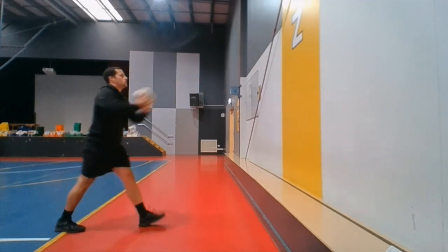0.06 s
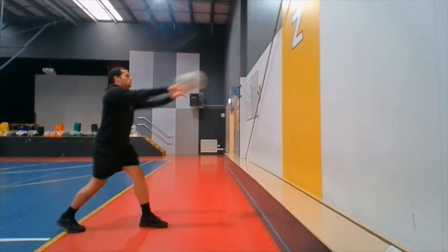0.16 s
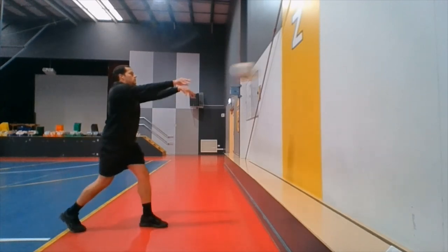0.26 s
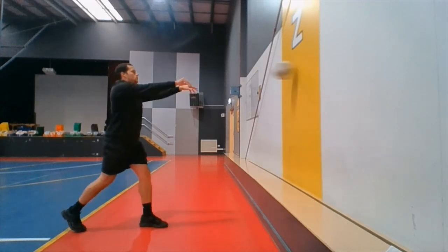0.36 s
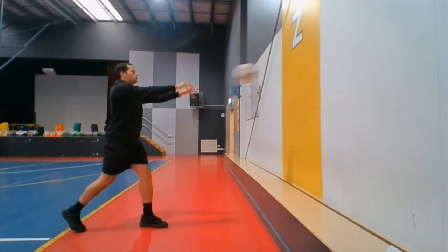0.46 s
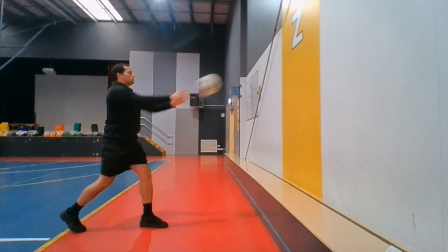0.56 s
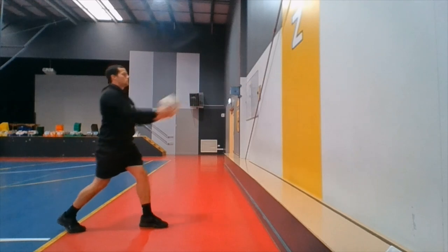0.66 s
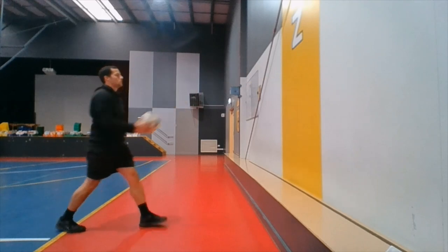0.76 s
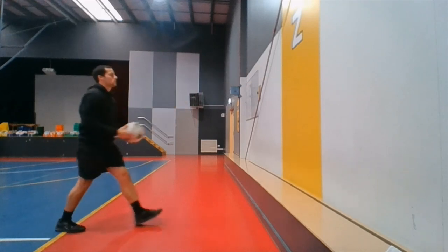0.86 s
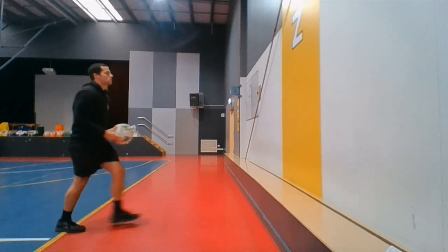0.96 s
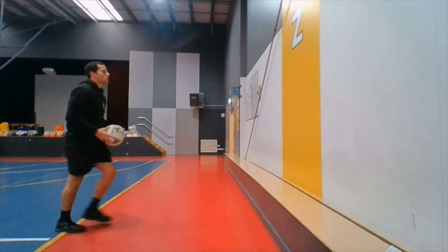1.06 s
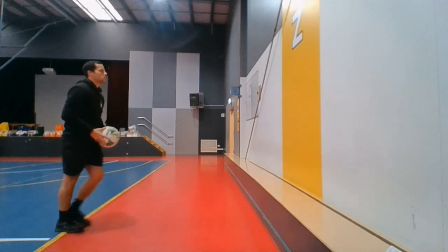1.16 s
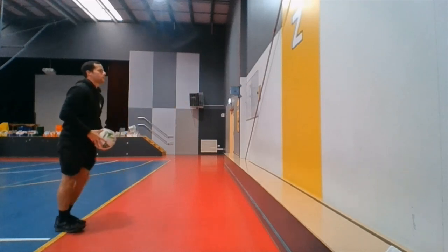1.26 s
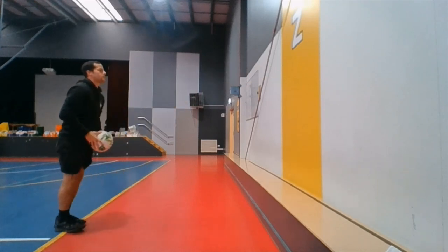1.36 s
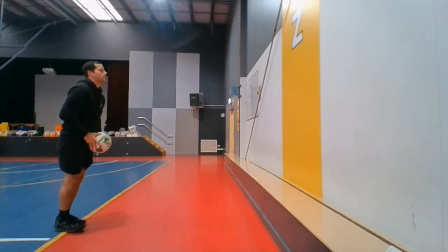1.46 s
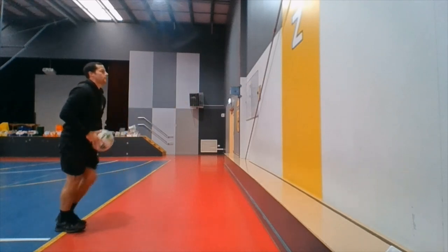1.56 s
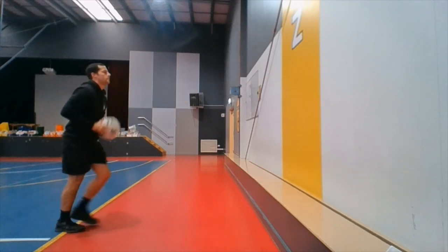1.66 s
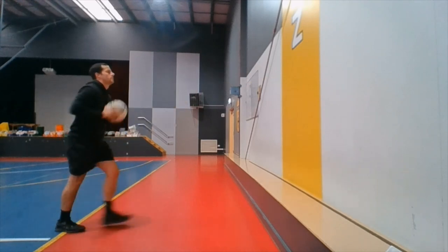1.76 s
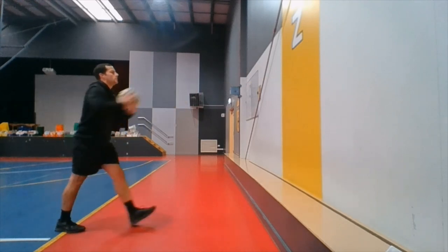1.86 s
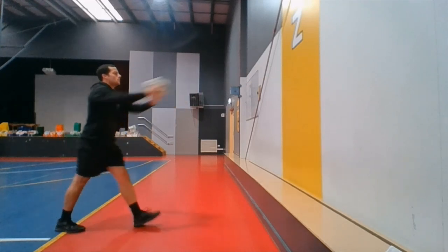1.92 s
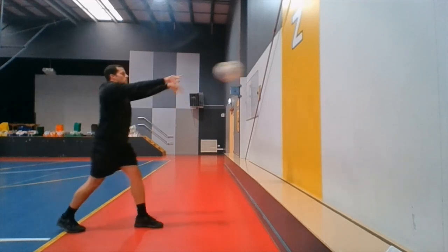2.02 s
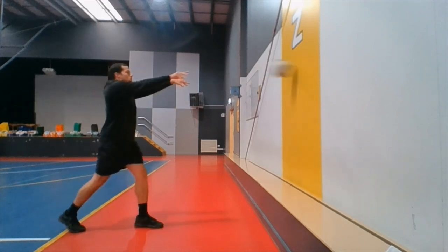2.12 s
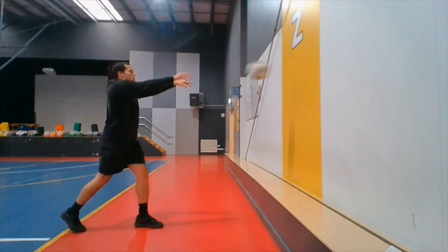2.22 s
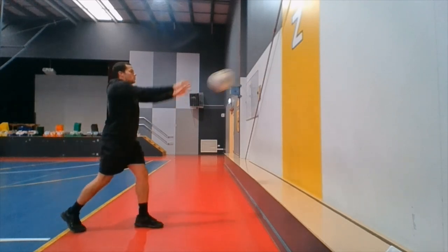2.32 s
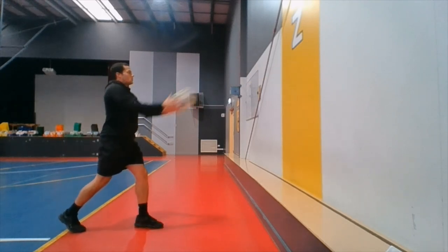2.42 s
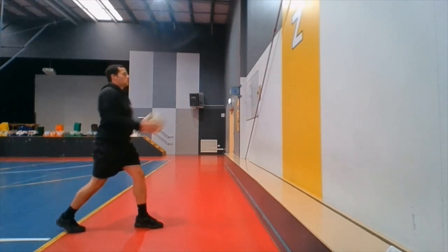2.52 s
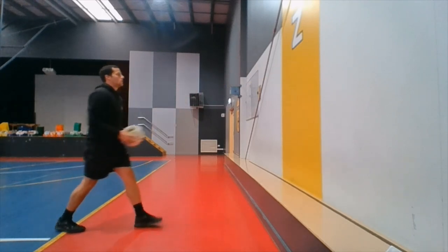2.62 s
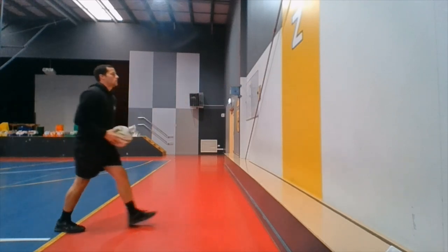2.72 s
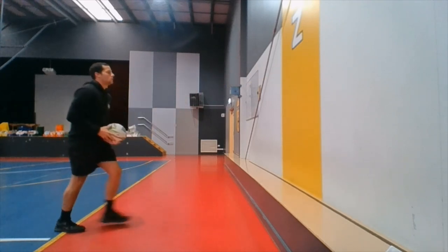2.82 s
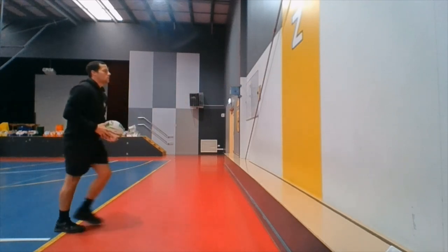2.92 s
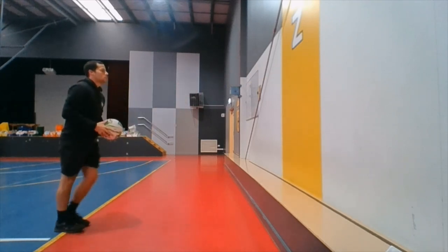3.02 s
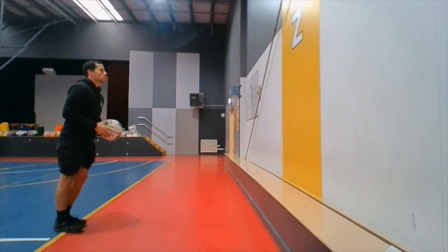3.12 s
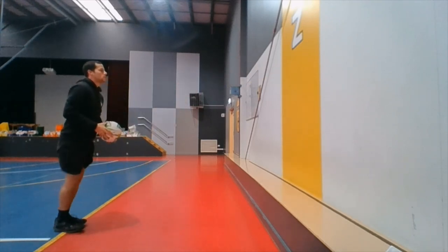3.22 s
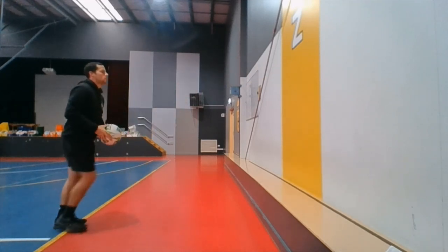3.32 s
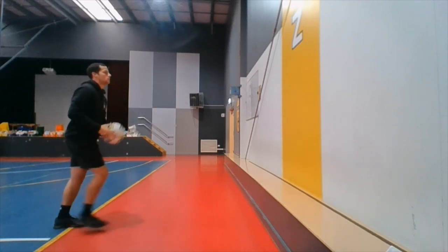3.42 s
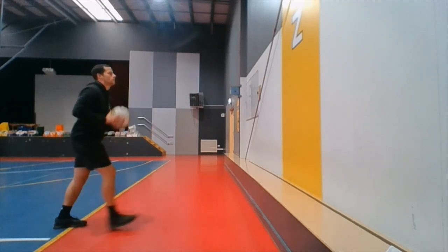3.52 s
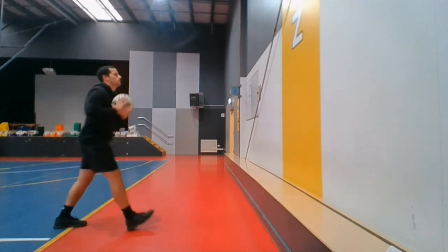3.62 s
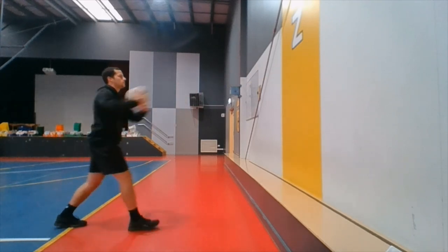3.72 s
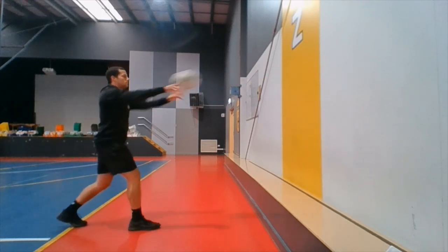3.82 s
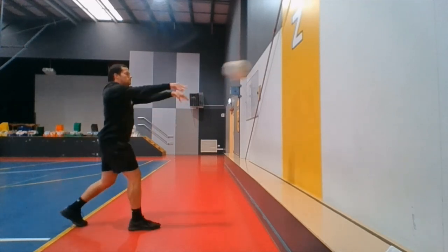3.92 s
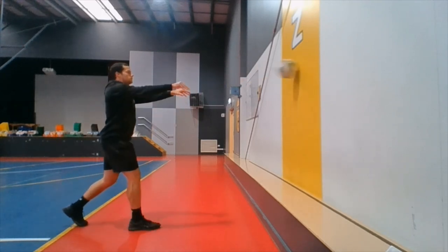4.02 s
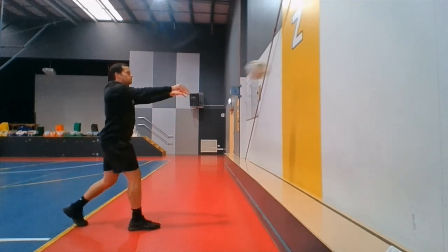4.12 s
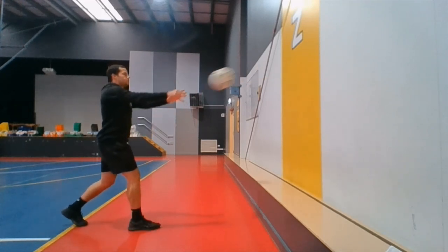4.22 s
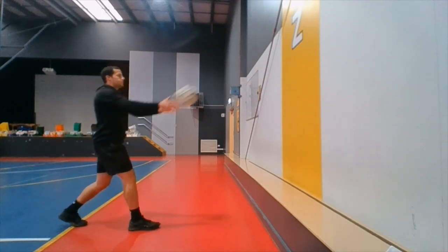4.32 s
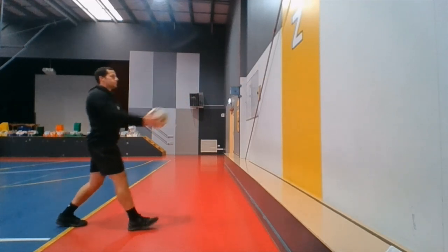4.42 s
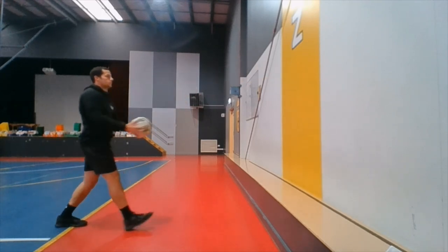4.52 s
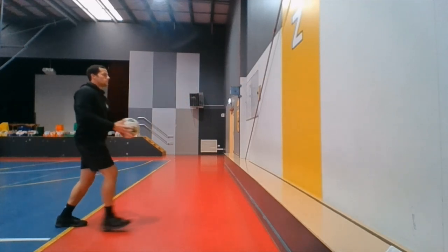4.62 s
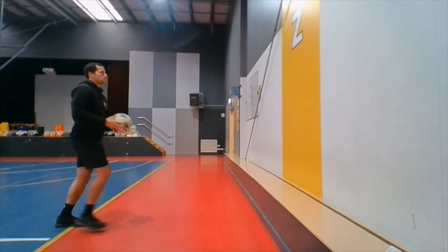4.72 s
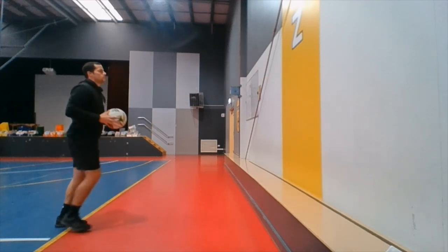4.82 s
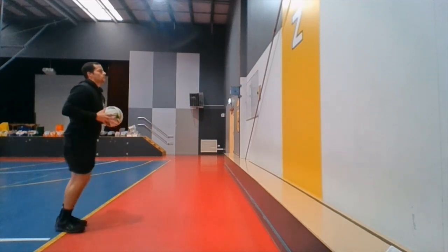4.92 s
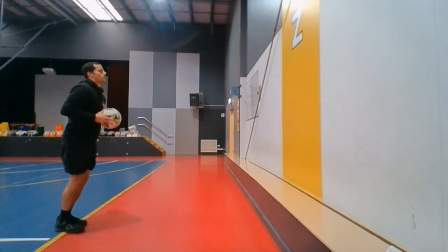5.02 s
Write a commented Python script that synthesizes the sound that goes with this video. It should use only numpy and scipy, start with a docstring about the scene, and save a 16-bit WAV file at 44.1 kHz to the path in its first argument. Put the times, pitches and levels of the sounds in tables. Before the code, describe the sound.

Three hard ball slaps against a wall, nearly two seconds apart, each booming and echoing long through a large empty sports hall.

```python
"""Large empty sports hall: a ball is thrown against the wall three times.
Each slap is a pressure spike that rings the ball, repeated by near surfaces; the wall booms in dying sines.
The hall swells and dies as noise in bands; the bass comes back in bursts from the far walls.
Shoes and sleeves scuff faintly around the throws (grainy resonant noise), over a quiet, patchy hiss."""
import sys
import numpy as np
from scipy import signal
from scipy.fft import rfft, irfft
from scipy.io import wavfile
from scipy.ndimage import uniform_filter1d

SR = 44100
rng = np.random.default_rng(int(sys.argv[2]) if len(sys.argv) > 2 else 0)


def dump_mix(stems):
    """Bounce the given channels to the path in sys.argv[1] as a 16-bit WAV at rate SR."""
    frames = np.atleast_2d(stems).T  # one column per channel
    limited = np.clip(frames, -1, 1)  # hard clip at full scale
    pcm = np.round(limited * 32767).astype(np.int16)
    wavfile.write(sys.argv[1], SR, pcm)


N = 223672


def gain_of(db):
    """Amplitude factor of a level in dB."""
    return 10 ** (np.asarray(db) / 20)


def evened(x):
    """Scales x to an rms of 1."""
    return x / np.sqrt(np.mean(x ** 2) + 1e-20)


def add(mix, start_s, sound):
    """Adds sound into mix at start_s, cut at the end of mix."""
    part = mix[round(start_s * SR):][:len(sound)]
    part += sound[:len(part)]


def coloured(x, points):
    """Filters x by a list of (f/Hz, gain/dB) joined on a log-frequency axis."""
    points_hz, points_db = np.transpose(points)
    f_hz = np.fft.rfftfreq(len(x), 1 / SR)
    gain_db = np.interp(np.log(f_hz + 1), np.log(points_hz), points_db)
    return irfft(rfft(x) * gain_of(gain_db), len(x))


def tilted(x, db_per_octave):
    """Tips the spectrum around 1 kHz, from 500 Hz to 8 kHz; flat outside."""
    return coloured(x, [(500, -db_per_octave), (8000, 3 * db_per_octave)])


def ring(modes, t):
    """The dying sines of a struck thing."""
    return sum(gain_of(db - 60 * t / t60_s) * np.sin(2 * np.pi * hz * t) for hz, db, t60_s in modes)


# slaps: t/s, crack peak/dB, spike f/Hz, crack tilt/(dB/octave), floor return/dB, boom/dB,
#        hall/dB, hall tilt/(dB/octave), hall body/dB, treble life/(factor on t60)
SLAP_EVENTS = [(0.3621, -2, 2262, -1.5, -4.5, -24.5, -27.5, 1, -3.5, 1.095),
               (2.1828, -2.5, 2826, 0, -3, -20.5, -26, 2.5, -0.5, 0.81),
               (4.0629, -3, 1720, -1.5, -17.5, -22, -27, 2.5, -1, 0.79)]
LEAD_S, PRESS_S = .01, .004  # crack buffer, and wall boom, start this long before contact


def slaps():
    """Crack, boom of the wall and the hall's answer; each slap lands a little differently."""
    out = np.zeros(N)
    low = boom(PRESS_S)
    paths = rfft(rng.standard_normal(2 * SR))
    for (s, crack_db, spike_hz, crack_tilt, floor_db, boom_db,
         hall_db, hall_tilt, body_db, treble_life) in SLAP_EVENTS:
        tail = tilted(hall_tail(paths, treble_life), hall_tilt)
        tail = coloured(tail, [(500, body_db), (900, 0)])
        add(out, s - LEAD_S, crack(crack_db, floor_db, spike_hz, crack_tilt, LEAD_S))
        add(out, s - PRESS_S, gain_of(boom_db) * low)
        add(out, s, gain_of(hall_db) * tail)
    return out


# air in the ball and its skin: f/Hz, level/dB, t60/s
BALL_MODES = [(612, -17.5, 0.11), (996, -23, .04), (1290, -11, 0.033), (1600, -13.5, 0.019),
              (1994, -18.5, 0.015), (2680, -19.5, 0.026), (3590, -22, 0.059), (3630, -21, 0.012),
              (4570, -25.5, 0.011), (4770, -29.5, 0.018), (6150, -29.5, .04), (7030, -24.5, 0.051)]
# first returns of the crack from nearby surfaces: delay t/s, level/dB
NEAR_RETURNS = [(.0011, -5.5), (.0038, -13.5), (.0055, -11.5), (.0085, -16), (0.0112, -18)]
FLOOR_DELAY_S = .0026


def crack(peak_db, floor_db, hz, tilt, lead_s):
    """A pressure spike of about one cycle, lead_s in, rings the ball; near surfaces repeat it."""
    t = np.arange(4096) / SR - lead_s
    after = np.maximum(t, 0)
    cycle = np.cos(2 * np.pi * hz * t)
    spike = np.exp(-(1.5 * hz * t) ** 2) * cycle
    lead_in = 0.36 * np.exp(np.minimum(t, 0) / 0.00044) * cycle * (t < 0)  # swells up to the spike
    ringing = ring(BALL_MODES, after) * (1 - np.exp(-after / 0.00013))
    tick = 1.1 * np.exp(-(t / .00004) ** 2)  # sharp edge of the contact
    direct = spike + tick + lead_in + ringing
    out = direct.copy()
    for delay_s, echo_db in [*NEAR_RETURNS, (FLOOR_DELAY_S, floor_db)]:
        add(out, delay_s, gain_of(echo_db) * direct)
    out = tilted(out, tilt)
    return gain_of(peak_db) * out / abs(out).max()


# wall panel: f/Hz, level/dB, t60/s
WALL_MODES = [(78, 0, 0.79), (138, -12.5, 0.36), (220, -18, 0.81), (410, -15, 0.2)]
# first bass echoes, from walls at different distances: delay t/s, level/dB, f/Hz
BASS_ECHO_ROWS = [(.09, -3, 139.2), (.1, -6, 79), (.14, -5, 50.6), (.206, -15, 46.3), (0.256, -10, 62.3),
                  (.35, -16.5, 54.1), (.468, -23, 59.1), (.735, -29.5, 66)]
ECHO_S = .038  # burst lengths: full width at 1/e
# then the bass runs to and fro between the end walls
FLUTTER_S, TRIP_S, BURST_S = .585, .195, 0.081
FLUTTER_DB, TRIP_LOSS_DB, FLUTTER_HZ = -24.5, 6, 52.8


def boom(lead_s):
    """The wall gives way as the ball presses in, rings, and its bass comes back from afar."""
    t = np.arange(2 * SR) / SR
    out = -ring(WALL_MODES, t) * (1 - np.exp(-(t / .005) ** 2)) * np.exp(-(t / 0.094) ** 6)
    echoes = [(*row, ECHO_S) for row in BASS_ECHO_ROWS]
    trips = [(FLUTTER_S + k * TRIP_S, FLUTTER_DB - k * TRIP_LOSS_DB, FLUTTER_HZ, BURST_S)
             for k in range(6)]
    for delay_s, db, hz, length_s in echoes + trips:
        late = t - lead_s - delay_s
        envelope = np.exp(-(2 * late / length_s) ** 2)
        out = out + gain_of(db) * envelope * np.cos(2 * np.pi * hz * late)
    return out


# hall bands: centre f/Hz, colour/dB, t60/s (before treble life)
HALL_BANDS = [(30, -4.5, 2.1), (60, -9.5, 0.73), (117, 0.5, 1.58), (230, 2.5, 1.794), (397, 1, 1.837),
              (640, -5.5, 1.94), (1130, -8.5, 2), (2010, -7, 1.686), (2400, -12, 1.615), (4000, -14.5, 1.4),
              (5300, -17, 1.11), (6800, -12.5, 0.88), (9060, -12.5, 0.94)]
# level course of bass, middle, treble: hush before the roof answers/dB, roof return/dB,
#   swell from the far walls/dB, sag after it/dB, level once the sag is over/dB,
#   late fade/(dB/s), surge with each trip between the end walls/dB
REGISTER_FILLS = [(-1.5, 2.5, 3.5, -.5, -1, 9.5, 2.5), (0.2, 2.5, 5, -3.5, 1.5, 32, 0.14),
                  (-12, 7.5, -0.5, 0, 1.8, 11, 0.4)]
# pitch the hall favours as it dies: f/Hz, half width at 1/e/Hz, gain/(dB/s)
FAVOURED_PITCH = (1500, 120, 2.2)
REGISTER_EDGES_HZ = [500, 2500]
UNEVEN_DB = 1.5  # rms of chance lumps in the reflections
LUMPS, LUMPS_PER_S = 400, 200
MIDDLE_SHARE = .5  # exponent: how far the middle bands follow the treble life


def hall_tail(paths, treble_life):
    """Dense reflections in overlapping bands, each dying at its own speed."""
    t = np.arange(2 * SR) / SR
    f_hz = np.fft.rfftfreq(len(t), 1 / SR)
    same = np.clip(1.1 - f_hz / 600, .3, 1)  # long waves take the same paths for every slap
    z = same * paths + np.sqrt(1 - same ** 2) * rfft(rng.standard_normal(len(t)))
    lumps = uniform_filter1d(rng.standard_normal((len(HALL_BANDS), LUMPS)), size=4, axis=1)
    lumps = evened(uniform_filter1d(lumps, size=3, axis=0))
    fills_db = [fill(t, *row) for row in REGISTER_FILLS]
    centres = np.log([row[0] for row in HALL_BANDS])
    out = 0
    for own, lump, (hz, db, t60_s) in zip(np.eye(len(HALL_BANDS)), lumps, HALL_BANDS):
        share = np.interp(np.log(f_hz + 1), centres, own)
        band = evened(irfft(z * share, len(t)))
        register = np.searchsorted(REGISTER_EDGES_HZ, hz)
        lasts_s = t60_s * treble_life ** (0, MIDDLE_SHARE, 1)[register]
        uneven_db = UNEVEN_DB * np.interp(t, np.arange(LUMPS) / LUMPS_PER_S, lump)
        out = out + band * gain_of(db + fills_db[register] + uneven_db - 60 * t / lasts_s)
    hz, width_hz, rise_db_per_s = FAVOURED_PITCH
    favoured = irfft(rfft(out) * np.exp(-((f_hz - hz) / width_hz) ** 2), len(t))
    return (out + favoured * (gain_of(rise_db_per_s * t) - 1)) / 2


# swell: t/s of start, full, half gone, gone
SWELL_TIMES_S = (.055, .088, .19, .27)
# single walls standing out of the swell: delay t/s, level/dB
WALL_RETURNS = [(.085, 3.5), (.12, 3), (.15, 1.5), (0.184, 1.8)]
RETURN_S = 0.0091  # half width at 1/e
BUILD_DB, BUILD_S = -10.5, 0.0046  # the hall starts empty
ROOF_S, ROOF_FADE_S = .021, 0.0083
RECOVER_S, FADE_S = 0.78, 1.12  # sag is over; late fade starts


def fill(t, hush_db, roof_db, swell_db, sag_db, settled_db, fade_db_per_s, surge_db):
    """Level in dB around the even decay: build-up, hush, roof return, swell, sag, surges, late fade."""
    build = BUILD_DB * np.exp(-t / BUILD_S)
    roof_return = roof_db * np.exp(-(t - ROOF_S) / ROOF_FADE_S)
    roof = np.where(t < ROOF_S, hush_db * t / ROOF_S, roof_return)
    returns = sum(db * np.exp(-((t - s) / RETURN_S) ** 2) for s, db in WALL_RETURNS)
    swell = np.interp(t, (*SWELL_TIMES_S, RECOVER_S), [0, swell_db, swell_db / 2, sag_db, settled_db])
    surge = surge_db * np.cos(2 * np.pi * (t - FLUTTER_S) / TRIP_S) * np.clip(t / FLUTTER_S, 0, 1)
    late_fade = fade_db_per_s * np.maximum(t - FADE_S, 0)
    return build + roof + returns + swell + surge - late_fade


# scuffs of shoes and sleeves: t/s, level/dB, centre f/Hz, rise/s, t60/s
SCUFF_EVENTS = [(.039, -67, 890, 0.0048, 0.64), (.079, -63.5, 2600, 0.028, 0.19),
                (.139, -59.5, 890, 0.00061, 0.42), (.253, -54, 1480, .02, 0.58),
                (1.49, -56, 986, 0.04, .31), (1.91, -64.5, 894, .018, 0.3),
                (1.935, -64.5, 1106, 0.015, 0.53), (2.021, -54.5, 852, 0.0016, 0.12),
                (2.049, -59, 910, .003, 0.15), (3.18, -65, 588, 0.0036, 0.19),
                (3.705, -66.5, 874, .0033, 0.23), (3.727, -65, 849, .0048, .18),
                (3.79, -60, 620, 0.032, 0.19), (4.924, -56, 638, .001, 0.14), (4.99, -62, 700, 0.009, 0.6)]
SCUFF_WIDTH = 0.83  # full width at half amplitude, as a share of the centre


def scuffs():
    """Grainy rubbing noise in a broad resonance, with a knock at contact and a short tail."""
    out = np.zeros(N)
    t = np.arange(SR // 2) / SR
    f_hz = np.fft.rfftfreq(len(t), 1 / SR)
    noises = rng.standard_normal((len(SCUFF_EVENTS), 2, len(t)))
    for (s, db, hz, rise_s, t60_s), (z, g) in zip(SCUFF_EVENTS, noises):
        grain = gain_of(3.9 * evened(uniform_filter1d(g, 200)))
        resonance = 1 / (1 + abs((f_hz / hz - 1) / SCUFF_WIDTH * 2) ** 1.4)
        rub = evened(irfft(rfft(z * grain) * resonance, len(t)))
        knock = 1 + 0.59 * np.exp(-t / .006)
        add(out, s, rub * (1 - np.exp(-t / rise_s)) * knock * gain_of(db - 60 * t / t60_s))
    return out


# hiss spectrum: f/Hz, relative level/(dB per Hz)
HISS_COLOUR = [(12, -52.5), (20, -15), (54, -6.5), (141, -15.5), (185, -26.5), (380, -18.5), (475, -24.5),
               (1410, -25.5), (3110, -34), (3610, -34), (5230, -37.5), (6220, -28.5), (7400, -28),
               (9620, -43), (16300, -120)]
HISS_RMS_DB, PATCH_DB = -75.5, 2.5


def hiss():
    """Air handling rumble and microphone hiss: coloured noise in time-frequency patches."""
    _, _, z = signal.stft(rng.standard_normal(N + 1024), nperseg=512)
    patches = uniform_filter1d(rng.standard_normal(z.shape), 8, 0)
    patches = evened(uniform_filter1d(patches, 10, 1))
    patchy = signal.istft(z * gain_of(PATCH_DB * patches), nperseg=512)[1][:N]
    return gain_of(HISS_RMS_DB) * evened(coloured(patchy, HISS_COLOUR))


def scene():
    """Sums slaps, scuffs and hiss into one channel."""
    return (slaps() + scuffs() + hiss())[None]


# overall treble colour, notch near 8 kHz and small hump at 8.7 kHz: f/Hz, gain/dB
TREBLE_COLOUR = [(7200, 3), (7500, -2), (7800, -27), (8050, -37.5), (8400, -9.5), (8700, -3.5), (9000, -20)]
LOW_CUT_HZ, EDGE_HZ = 18, 9100


def record(dry):
    """Cuts the lowest bass, notches the treble near 8 kHz; then the band limit."""
    low_cut = signal.butter(1, LOW_CUT_HZ, "high", fs=SR)
    heard = signal.lfilter(*low_cut, coloured(dry[0], TREBLE_COLOUR))
    band_limit = signal.firwin(511, EDGE_HZ, window=("kaiser", 9), fs=SR)
    return signal.oaconvolve(heard, band_limit, "same")[None]


dry = scene()
out = record(dry)
dump_mix(out)
```